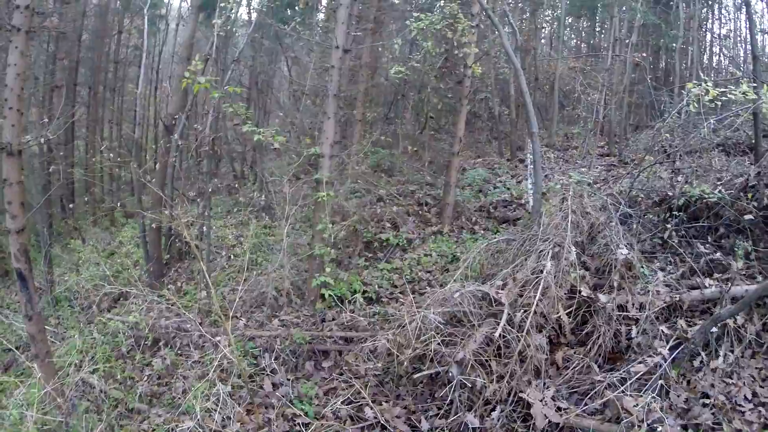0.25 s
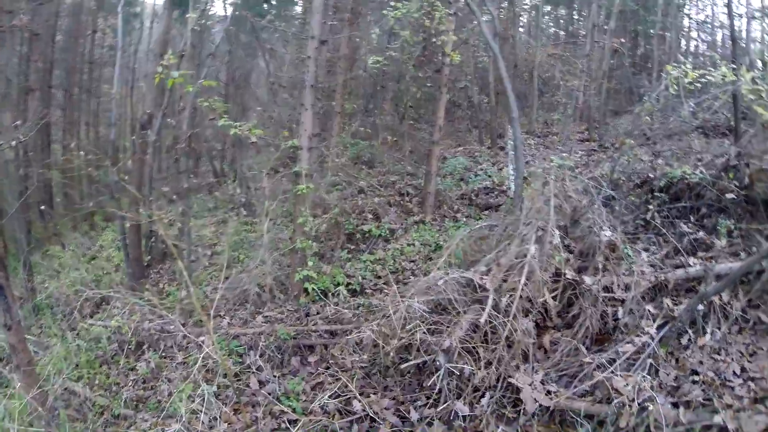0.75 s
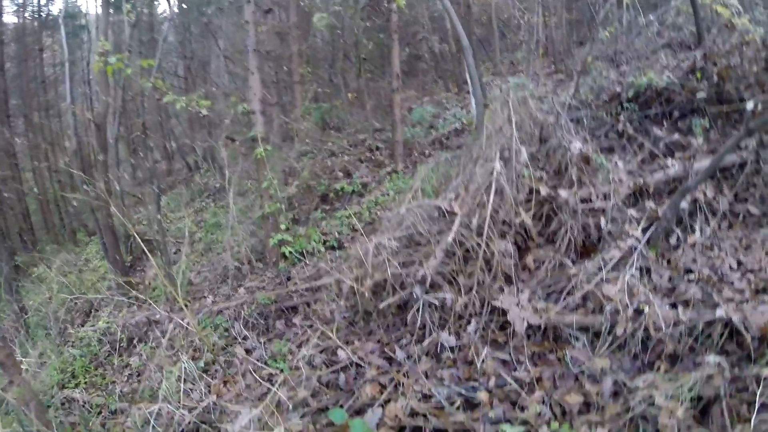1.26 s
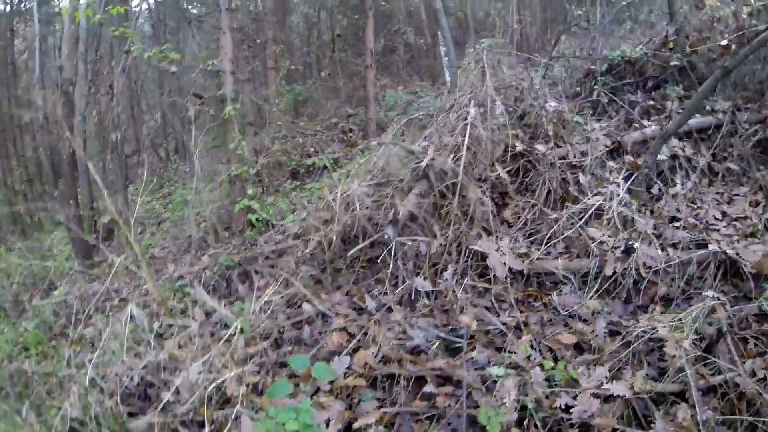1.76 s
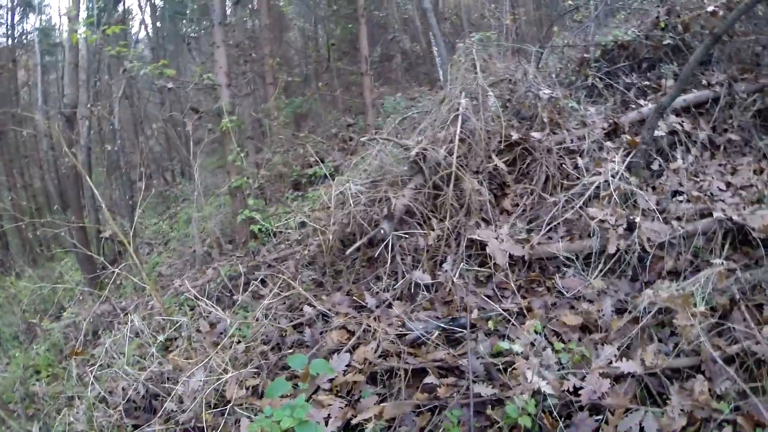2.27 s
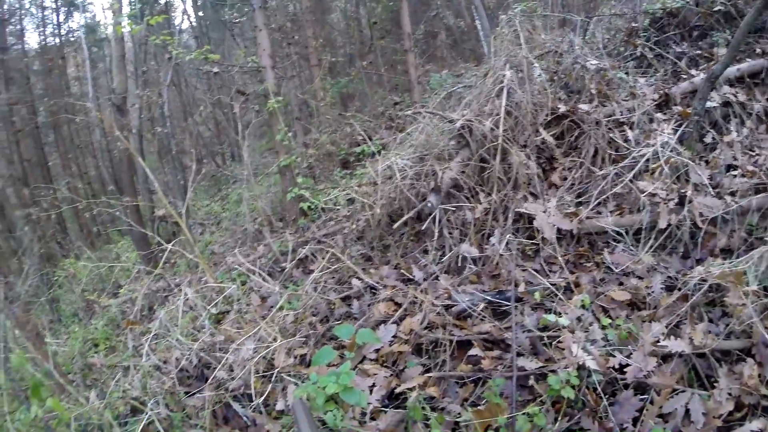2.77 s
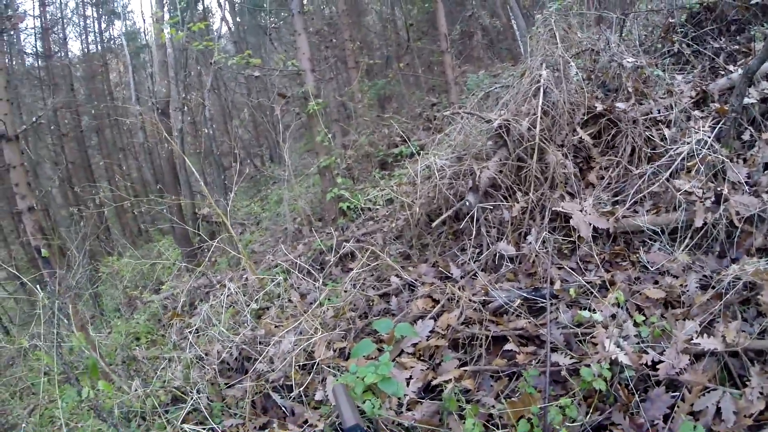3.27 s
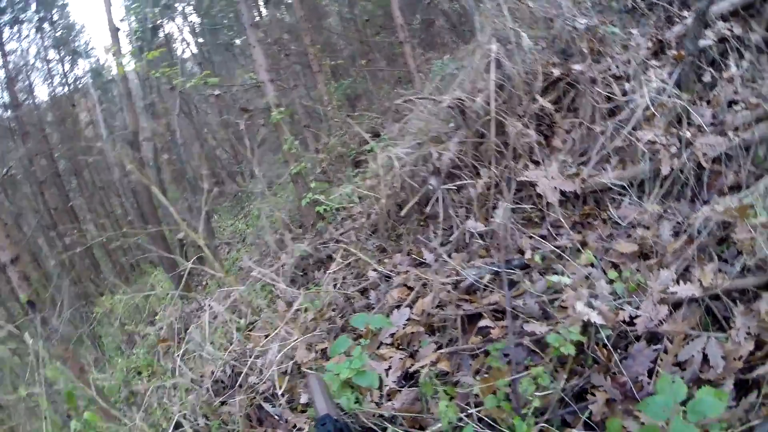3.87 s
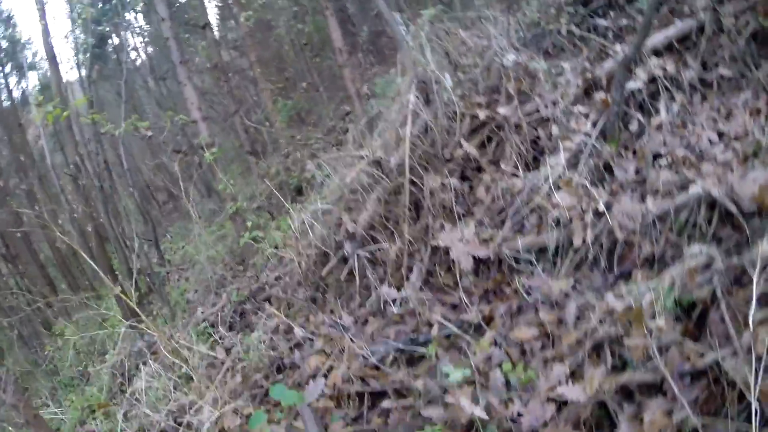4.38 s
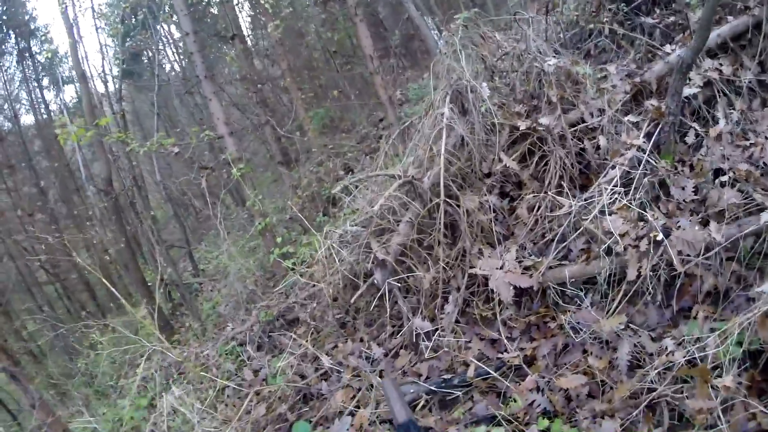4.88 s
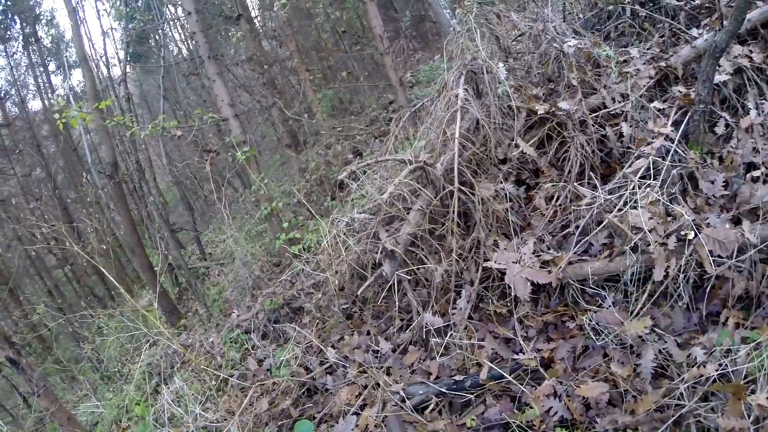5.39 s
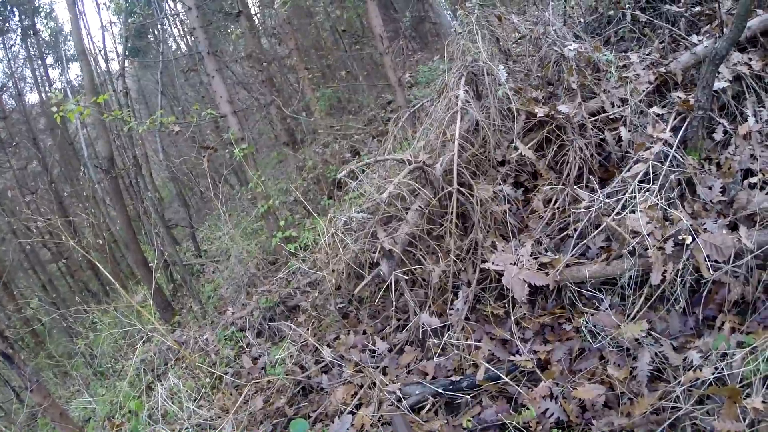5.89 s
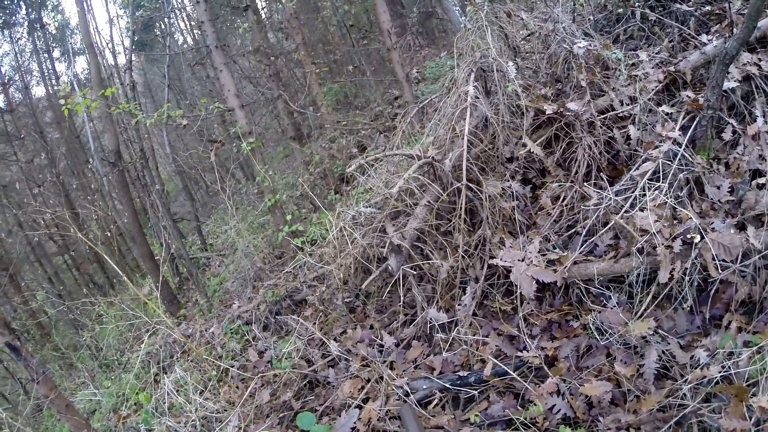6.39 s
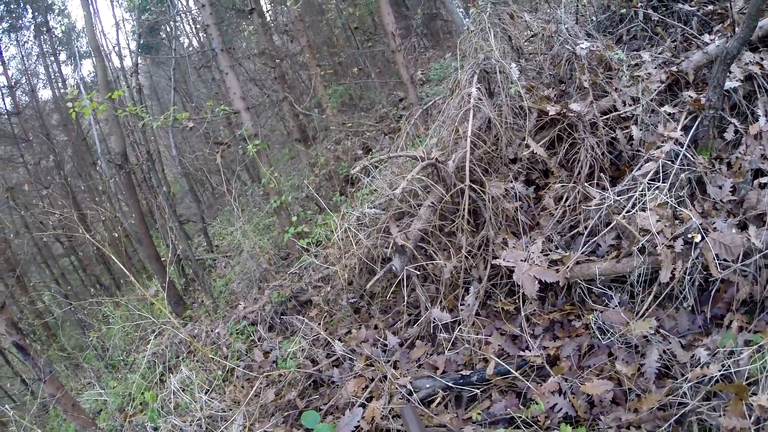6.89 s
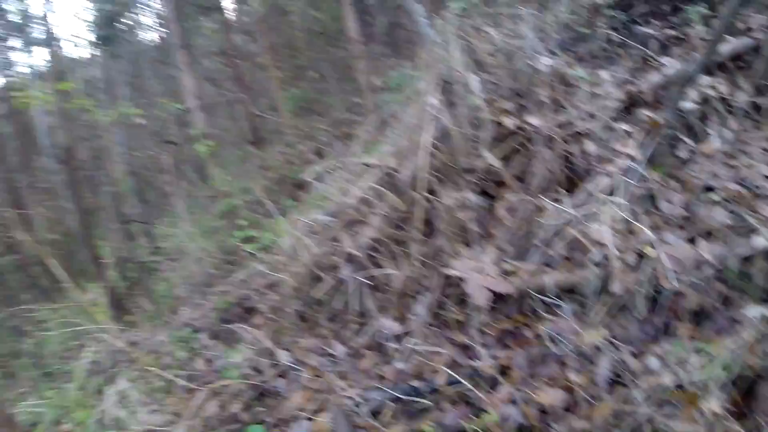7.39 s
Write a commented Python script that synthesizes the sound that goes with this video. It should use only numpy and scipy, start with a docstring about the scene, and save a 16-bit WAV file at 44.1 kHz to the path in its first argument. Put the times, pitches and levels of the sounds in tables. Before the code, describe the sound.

Someone moves slowly through dry leaves and brush on a wooded hillside. Small twigs tick first, then a hard double crack and leaf crunch come near two seconds, and another crunching step past four. Clothing rubs, a sleeve swishes, and the camera's little motor chatters in fast pulses close to the microphone, over soft air hiss and a thin electronic whine.

```python
"""A wooded slope: slow steps through dry leaves and brush, heard from a hand-held camera.
Twigs snap as bursts of tearing noise that ring the stick; the camera housing colours them and the woods answer.
Leaves crush as clumps of tiny impulses; clothes and the gripping hand are filtered noise that swells with each move.
A small motor in the camera chatters in runs of thumps, knocks and whirrs, over air, hiss and a thin electronic whine."""
import sys
import numpy as np
from scipy import signal
from scipy.fft import rfft, irfft, next_fast_len
from scipy.io import wavfile
from scipy.ndimage import uniform_filter1d, map_coordinates

SR = 44100
rng = np.random.default_rng(int(sys.argv[2]) if len(sys.argv) > 2 else 0)


def wrap_up_sound(samples):
    """Save the sound to the file named by the first command line argument, as 16-bit audio."""
    columns = np.atleast_2d(samples).T
    # keep every value between -1 and 1, then stretch to whole-number steps
    tamed = np.clip(columns, -1, 1)
    steps = np.round(tamed * 32767).astype(np.int16)
    wavfile.write(sys.argv[1], SR, steps)


N = 337365  # length [samples]


def amp(db):
    """Decibels to gain."""
    return 10 ** (np.asarray(db) / 20)


def unit(x):
    """Scale to rms 1."""
    return x / np.sqrt(np.mean(x ** 2) + 1e-20)


def along(points, hz):
    """Read (frequency [Hz], value) points on a log frequency axis."""
    f, v = np.transpose(points)
    return np.interp(np.log(hz + 1), np.log(f + 1), v)


def wobble(rate):
    """A smooth random curve with rate knots a second."""
    knots = rng.standard_normal(int(N * rate / SR) + 4)
    return map_coordinates(knots, [np.arange(N) * rate / SR])


def coloured(x, gain_db):
    """Causal minimum-phase filter, made by folding the cepstrum of gain_db(hz)."""
    m = 2 * next_fast_len(len(x) // 2 + 2048)
    cepstrum = irfft(np.log(amp(gain_db(np.fft.rfftfreq(m, 1 / SR))) + 1e-6))
    cepstrum[1:m // 2] *= 2
    cepstrum[m // 2 + 1:] = 0
    return irfft(rfft(x, m) * np.exp(rfft(cepstrum)))[:len(x)]


def shaped(x, spectrum):
    """Filter x through a spectrum, then scale to rms 1."""
    return unit(coloured(x, lambda hz: along(spectrum, hz)))


def add(track, s, sound):
    """Mix a sound into the track at s seconds."""
    part = track[max(round(s * SR), 0):][:len(sound)]
    part += sound[:len(part)]


def tone(hz):
    """A sine that follows a pitch curve."""
    return np.sin(2 * np.pi * np.cumsum(hz) / SR)


def fractures(per_s, spread_db):
    """Random impulses, scaled to rms 1: many small, a few large."""
    sizes = amp(spread_db * np.minimum(rng.exponential(size=N), 3))
    signs = rng.choice([-1, 1], N)
    return unit((rng.random(N) < per_s / SR) * signs * sizes)


def gesture(start, end, db, rise, fall):
    """A gain that rises, holds from start to end [s] and dies away; slopes in dB a second."""
    t = np.arange(N) / SR
    return amp(db - rise * np.maximum(start - t, 0) - fall * np.maximum(t - end, 0))


def together(gains, rest_db):
    """Overlapping gestures add in power over a resting level."""
    return np.sqrt(amp(rest_db) ** 2 + sum(gain ** 2 for gain in gains))


# colour of the still air and hiss: (frequency [Hz], relative gain [dB])
AIR_COLOUR = [(25, -6.5), (110, 2.5), (300, -10.5), (1000, -16), (2000, -17.5), (4000, -28.5),
              (5600, -21.5), (6500, -21.5), (8500, -29.5), (13500, -31.5), (15200, -24), (16000, -48)]


def background(air_db=-62.0, whine_db=-65.5, whine_hz=5000, blip_hz=260):
    """Still air and hiss, with a fuzzy sine whine that flicks upward four times a second."""
    t = np.arange(N) / SR
    blips = np.maximum(np.cos(2 * np.pi * (t - .05) / .2502), 0) ** 30
    pitch = whine_hz + blip_hz * blips + 22 * wobble(30) + 80 * wobble(700)
    strength = amp(-2 * blips + 2.8 * wobble(120))
    whine = amp(whine_db) * strength * tone(pitch)
    air = amp(air_db) * shaped(rng.standard_normal(N), AIR_COLOUR)
    return whine + air


# how long the tail among the trunks rings: (frequency [Hz], 60 dB decay time [s])
TRUNK_DECAY = [(150, 0.43), (1000, 0.27), (4000, 1), (12000, 0.55)]


def woods(x, wet_db=-23, slope_db=-13, slope_delay=.0108):
    """The slope throws back one bright echo; trunks scatter a faint, diffuse tail."""
    hz, t, grains = signal.stft(rng.standard_normal(SR // 2), SR, nperseg=256)
    decay = amp(-60 * t / along(TRUNK_DECAY, hz)[:, None])
    tail = signal.istft(grains * decay, SR, nperseg=256)[1]
    tail = np.pad(tail, (SR // 125, 0))  # the tail starts 8 ms late
    delayed = np.pad(x, (round(slope_delay * SR), 0))[:N]
    echo = coloured(delayed, lambda f: along([(300, -15.0), (2500, -6.5), (8000, 0.5)], f))
    scattered = signal.fftconvolve(x, tail / np.linalg.norm(tail))[:N]
    return amp(slope_db) * echo + amp(wet_db) * scattered


# motor runs: (first stroke [s], end [s], stroke period [s], level over the motor's own level [dB])
MOTOR_RUNS = [(2.138, 3.3, .0884, -.5), (3.632, 5.2, .091, .5), (5.736, 6.44, .0897, 1.5),
              (6.895, 7.64, .0885, 1.5)]
# colour of the rattle: (frequency [Hz], relative gain [dB])
RATTLE_COLOUR = [(50, -1), (110, 11), (200, -10.5), (380, -9.5), (520, 6), (700, 8), (950, 5.5), (1200, 5),
                 (1500, -3), (2300, -2.5), (3300, -8.5), (4200, -5.5), (6500, -16), (14000, -40)]


def motor(level_db=-55.5, rattle_db=3, thump_db=3, knock_db=4, spin_db=6, whirr_db=-2,
          thump_hz=105, knock_hz=550, whirr_hz=950, start_hz=800, spun_hz=1060, spin_time=0.02606):
    """Eleven jerks a second: a thump, a gear knock and a rising whirr, over a steady whirr and rattle."""
    t = np.arange(N) / SR
    running, age = np.zeros(N), np.zeros(N)  # age: seconds since the last stroke
    for start, end, period, db in MOTOR_RUNS:
        on = (t > start) & (t < end)
        running += on * amp(db)
        age += on * ((t - start) % period)

    def swell(centre, width):
        """A bump in every stroke, slightly uneven in level."""
        return np.exp(-((age - centre) / width) ** 2) * amp(1.9 * wobble(15))

    jerk, mesh, spin_up = swell(.007, .006), swell(.012, .005), swell(.018, .013)
    thump = amp(thump_db) * jerk * tone(thump_hz + 15 * wobble(60))
    knock = amp(knock_db) * mesh * tone(knock_hz + 50 * wobble(200))
    spin_hz = start_hz + (spun_hz - start_hz) * np.minimum(age / spin_time, 1) + 55 * wobble(400)
    spin = amp(spin_db + 2.4 * wobble(180)) * spin_up * tone(spin_hz)
    coast = amp(whirr_db + 1.2 * wobble(160)) * tone(whirr_hz + 90 * wobble(350))
    rattle = amp(rattle_db) * (jerk + 0.38) * shaped(rng.standard_normal(N), RATTLE_COLOUR)
    return amp(level_db) * running * (thump + knock + spin + coast + rattle)


# the hand changes its grip on the camera: (start [s], end [s], level [dB])
GRIP_CHANGES = [(0.737, 0.75, -49.5), (1.2, 1.38, -53.5), (1.87, 1.9, -69), (3.04, 3.1, -60.5),
                (4.39, 4.42, -50), (4.78, 4.91, -50.5)]


def handling(slope_db_per_s=150, steady_db=-65.5):
    """The hand rumbles on the camera body: low noise that swells at each change of grip."""
    grips = [gesture(*row, slope_db_per_s, slope_db_per_s) for row in GRIP_CHANGES]
    rumble = shaped(rng.standard_normal(N), [(10, -13.5), (30, -9), (65, -11.5), (200, -27), (800, -67)])
    return together(grips, steady_db) * rumble


# strides and shifts of weight, levels before each layer's trim:
# (start [s], end [s], leaf rustle [dB], clothing [dB])
BODY_MOVES = [(0, 0.021, -63, -68), (0.721, 1.02, -61, -54), (1.661, 2.04, -54.5, -48.5),
              (2.401, 3.333, -62, -69), (3.97, 4.3, -53.5, -54.5), (4.449, 4.72, -48.5, -48.5),
              (5.105, 5.169, -61, -70), (5.6, 6.422, -66, -67), (6.97, 7.298, -63, -61),
              (7.5, 7.642, -58, -50.5)]
# the sole takes the full weight, levels before each layer's trim: (time [s], leaf crush [dB], clothing [dB])
FULL_WEIGHT = [(1.94, -41.5, -40.5), (4.69, -42.5, -48)]
MOVE_SLOPES = 55, 40.5  # rise, fall [dB/s]
FOOT_SLOPES = 200, 109  # rise, fall [dB/s]
STILL_LEAVES_DB, STILL_CLOTH_DB = -78, -66  # the walker standing, before each layer's trim


def walking():
    """Gains of the leaves and of the clothes: the same moves and footfalls drive both."""
    def effort(column, rest_db):
        """One layer's gain, from its own level column."""
        moves = [gesture(start, end, db[column], *MOVE_SLOPES) for start, end, *db in BODY_MOVES]
        falls = [gesture(s, s, db[column], *FOOT_SLOPES) for s, *db in FULL_WEIGHT]
        return together(moves + falls, rest_db)

    return effort(0, STILL_LEAVES_DB), effort(1, STILL_CLOTH_DB)


# a sleeve slides over the jacket: (start [s], end [s], level [dB])
SLEEVE_SLIDES = [(0.663, 1.3, -56), (1.65, 1.85, -57), (1.947, 2.195, -49), (6.236, 6.29, -59.5),
                 (7.45, 7.655, -52.5)]
# colour of the body fabric: (frequency [Hz], relative gain [dB])
FABRIC_COLOUR = [(40, -6), (110, -8.5), (280, 1.5), (480, -1), (650, -1.5), (950, -2.5), (1400, -12),
                 (2300, -11.5), (3300, -28), (5000, -50), (12000, -60)]
# colour of the sleeve: (frequency [Hz], relative gain [dB])
SLEEVE_COLOUR = [(100, -14), (400, -11.5), (900, -1), (1400, -2.5), (2200, -4), (3300, -11), (4500, -15),
                 (12000, -65)]


def clothes(sway, level_db=2.5, flutter_db=-2.6, arm_rise=150, arm_fall=120):
    """Fabric rubs as the walker shifts weight, and a sleeve swishes when the arm moves (slopes in dB/s)."""
    flutter = flutter_db * wobble(45)
    rub = sway * amp(level_db + flutter) * shaped(rng.standard_normal(N), FABRIC_COLOUR)
    arm = np.max([gesture(*row, arm_rise, arm_fall) for row in SLEEVE_SLIDES], axis=0)
    swish = arm * amp(flutter) * shaped(rng.standard_normal(N), SLEEVE_COLOUR)
    return rub + swish


# colour of crushed leaves: (frequency [Hz], relative gain [dB])
LEAF_COLOUR = [(150, -26), (400, -11.5), (700, -1.5), (1000, 4.5), (1500, -9.5), (2600, -10.5),
               (3200, -4.5), (4000, -10), (5400, -14.5), (6600, -11.5), (9000, -23), (15500, -34.5)]


def leaves(tread, level_db=5.0, spread_db=4, clump_db=-1.7, rib_db=-6.5):
    """Tiny leaf fractures come in clumps over the rub of leaf on leaf, with stiff ribs cracking among them."""
    rub = .7 * rng.standard_normal(N)
    crush = (fractures(1800, spread_db) + rub) * amp(clump_db * wobble(76))
    # a rib tears for a millisecond or two
    tearing = signal.lfilter([1], [1, -np.exp(-1 / (0.0017 * SR))], abs(fractures(70, 1.7)))
    ribs = amp(rib_db) * unit(tearing * rng.standard_normal(N))
    return tread * amp(level_db) * shaped(unit(crush) + ribs, LEAF_COLOUR)


def small_stalks(tread, count=16, over_db=2.0, scatter_db=-0.5, knock_db=-4, splinter_db=-1,
                 stick_hz=3000, octaves=0.79):
    """Twig rows for little stalks that give way at random, more often and louder under a heavier tread."""
    rows = []
    chances = (np.arange(count) + rng.random(count)) / count
    effort = np.cumsum(tread)
    for chance, (size, dryness, thinness) in zip(chances, rng.standard_normal((count, 3))):
        at = np.searchsorted(effort, chance * tread.sum())
        crack_db = 20 * np.log10(tread[at]) + over_db + scatter_db * size
        dry_db = splinter_db + scatter_db * dryness
        rows.append((at / SR, crack_db, knock_db, dry_db, stick_hz * 2 ** (octaves * thinness), 0))
    return rows


def breakage(crack_db, knock_db, splinter_db, stick_hz):
    """Thick sticks thud, woody knocks stop short, and a harder, drier break shakes more leaves."""
    # the thud takes a share of the knock and weakens in thinner, higher sticks
    thud_db = -4.5 + 0.53 * knock_db - 8.5 * np.log2(stick_hz / 1000)
    band_db = crack_db + np.array([thud_db, knock_db, 0, splinter_db])
    # a thin stalk rings for 18 ms; every 16.5 dB of woody knock halves that
    t60 = 0.018 * .5 ** (max(knock_db, 0) / 16.5)
    # -43 dB is a usual crack
    litter_db = -55 + 0.59 * (crack_db + 43) + 0.35 * splinter_db
    return band_db, t60, litter_db


# resonances of the camera shell: (centre [Hz], width [Hz], boost [dB])
SHELL_MODES = [(425, 120, 3), (1090, 290, 3), (3240, 230, 8.5), (6450, 460, 8.5)]


def housing(hz):
    """Gain in dB of the camera shell's resonances."""
    return sum(db / (1 + (2 * (hz - centre) / width) ** 2) for centre, width, db in SHELL_MODES)


# twigs and stalks breaking, levels before the twig trim: (time [s], crack [dB], woody knock over the crack [dB],
# dry splinter over the crack [dB], stick resonance [Hz], sparkle from 11 kHz up [dB])
TWIG_BREAKS = [(0.1665, -40, -6, -8.5, 3100, -2), (0.171, -41.5, -0.5, -9, 1110, -1),
               (0.2, -48.5, -1.5, -7, 1150, -5), (0.256, -32.5, 8, -7.5, 1004, -3),
               (0.599, -45, -3.5, -8.5, 1200, -2), (0.732, -43.5, 11.5, 1.5, 1210, -7),
               (0.734, -40.5, 5, -10, 1100, 4), (0.742, -41, -5, -11, 4770, -3),
               (0.789, -44.5, 4, -4, 926, 4), (0.868, -48, 0, -1.5, 1110, 9),
               (1.7063, -40, 2.5, -2.5, 1320, 1), (1.7481, -51, 16, 2.5, 656, 12),
               (1.81, -52.5, -7, 12.5, 6840, 2), (1.8285, -38.5, -1, 2.5, 6950, 1),
               (1.8543, -19.5, 1, 0, 850, -3), (1.8781, -22, -2, -3.5, 563, -3),
               (1.889, -52.5, 27.5, 0, 1010, -6), (1.9663, -46, 26.5, 2, 614, 1),
               (1.992, -41, 20, -5, 880, -3), (2.009, -41.5, 1, -4, 456, -5),
               (2.332, -52, -3, 5.5, 4220, -10), (2.36, -48, 0, -1, 3620, -14),
               (2.378, -49, -3.5, -11, 507, -4), (2.44, -56.5, -2, 3.5, 1110, -1),
               (2.478, -56, -4, 3, 640, 3), (2.7104, -47, 9.5, 2, 680, 6),
               (3.1778, -41, -39, -23, 3540, -17), (3.2415, -47, 8, 12, 1000, 8),
               (3.298, -44.6, -26, -6, 3560, 8), (3.368, -45.5, -27, -8, 3960, 2),
               (3.444, -47, -5, -4, 2640, 4), (3.594, -46.5, -9, -13.5, 2960, 9),
               (3.687, -52, -1, 1, 3930, -1), (4.069, -44, 5.5, -1.5, 1050, 9),
               (4.1315, -40, 8.5, -7.5, 1070, -2), (4.146, -43, 13.5, -13, 513, -5),
               (4.248, -40, 17, -4, 874, -9), (4.693, -40.5, 13, 2.5, 1080, 2),
               (4.717, -37, -4, -17, 3040, -8), (4.799, -44.5, -15, 2.5, 6380, 7),
               (4.813, -41, -6, -3, 830, -4), (4.827, -40.5, -1, -11, 890, -2),
               (4.883, -41.5, 0.5, -7.5, 870, 3), (5.104, -44.5, -2, -5, 920, 5),
               (5.1626, -32.5, -0.5, -6, 1170, 3), (5.3136, -43.5, -4, -2, 1330, 5),
               (5.3385, -53, 5, 5, 3930, 1), (5.4102, -47.5, -14, 3, 3800, 0),
               (5.519, -47.5, -4, -34, 2060, 3), (5.652, -45.5, -5, 1, 3300, 13),
               (5.843, -51.5, -3, 1.5, 1100, 0), (6.126, -52, -1, -1.5, 3500, 0),
               (6.2433, -59, 17, -20, 1210, -6), (6.414, -37.5, -13, -19, 2360, -4),
               (6.531, -54, 1, 0, 4330, 0), (6.5789, -29, 5.5, -6, 980, 5), (7.07, -48, 0, 2.5, 815, 17),
               (7.143, -44, -1, 1, 5870, 5), (7.159, -50.5, 2, -2, 4030, -11),
               (7.279, -50, -2, -6, 6400, 4), (7.33, -58.5, 15.5, -18, 420, -3),
               (7.566, -42, 3.5, -5.5, 830, -9.5), (7.601, -39.5, -6.5, -5, 870, -4)]
# centres of the thud, knock, crack and splinter bands: (frequency [Hz])
BAND_CENTRES = [330, 950, 2700, 6000]
# colour of a snap before its four bands are balanced: (frequency [Hz], relative gain [dB])
SNAP_COLOUR = [(40, -11), (110, -1.5), (260, 0.5), (620, 1), (1200, -3.5), (1450, -9), (2000, -4.5),
               (2600, -7), (3300, -7.5), (4700, -9), (5400, -16), (8000, -17.5), (13000, -34.5),
               (16000, -44)]
# colour of the shivering litter: (frequency [Hz], relative gain [dB])
SHIVER_COLOUR = [(150, -6), (400, -10), (1000, 4), (1600, -1), (4000, 3.5), (7000, 0.5), (9000, -8),
                 (12500, -13.5), (15500, -33)]


def twigs(breaks, level_db=-0.77, rise=0.00041, fibre_db=3, stick_db=7, stick_width=0.3,
          shiver_t60=0.37, shiver_grain_db=4.0):
    """Each twig's fibres fail within milliseconds and ring the stick; the litter around it then shivers."""
    out, t = np.zeros(N), np.arange(SR // 4) / SR
    hz = np.fft.rfftfreq(len(t), 1 / SR)
    edges, span = [120, 600, 1500, 4500, 15000], .008  # bands [Hz], time that band power refers to [s]
    for s, crack_db, knock_db, splinter_db, stick_hz, lift_db in breaks:
        band_db, t60, litter_db = breakage(crack_db, knock_db, splinter_db, stick_hz)
        fibres, sizes, litter, flakes = rng.standard_normal((4, len(t)))

        def stick(f):
            """Resonance of the stick [dB]."""
            return stick_db / (1 + (2 * (f / stick_hz - 1) / stick_width) ** 2)

        def sparkle(f):
            """Lift or loss of the top octave [dB]."""
            return along([(7000, 0), (11000, lift_db)], f)

        # a quick ring, then a weaker and slower tail
        ring = amp(-60 * t / max(t60, .004)) + amp(-24.0 - 60 * t / 0.098)
        stress = (1 - np.exp(-t / rise)) * ring
        tearing = np.tanh(fibres * amp(fibre_db * sizes)) * stress
        burst = coloured(tearing, lambda f: along(SNAP_COLOUR, f) + housing(f) + stick(f) + sparkle(f))
        # thick sticks thud and thin ones tick: steer each band to its own power
        power = 2 * abs(rfft(burst)) ** 2 / len(t) / (span * SR)
        own_db = [10 * np.log10(power[(hz > lo) & (hz < hi)].sum()) for lo, hi in zip(edges, edges[1:])]
        balance = list(zip(BAND_CENTRES, np.subtract(band_db, own_db)))
        add(out, s, amp(level_db) * coloured(burst, lambda f: along(balance, f)))
        # the shiver comes in millisecond flakes
        flaky = litter * amp(shiver_grain_db * unit(uniform_filter1d(flakes, size=50)))
        shiver = unit(coloured(flaky, lambda f: along(SHIVER_COLOUR, f) + .5 * sparkle(f)))
        fade = amp(litter_db - 60 * (t - .03) / shiver_t60) * (1 - np.exp(-t / 0.0029))
        add(out, s, fade * shiver)
    return out


def scene():
    """Sum every layer into one channel; only the snaps excite the woods."""
    tread, sway = walking()
    snaps = twigs(TWIG_BREAKS + small_stalks(tread))
    surroundings = background() + woods(snaps)
    camera = motor() + handling()
    walker = clothes(sway) + leaves(tread) + snaps
    return (surroundings + camera + walker)[None]


def record(dry, ceiling=.72, top_hz=15500):
    """The microphone rounds off the hardest peaks; the camera keeps nothing above its band limit."""
    rounded = dry / (1 + (dry / ceiling) ** 4) ** .25
    m = next_fast_len(N + SR // 2)
    kept = np.fft.rfftfreq(m, 1 / SR) < top_hz
    return irfft(rfft(rounded, m) * kept, m)[..., :N]


dry = scene()
out = record(dry)
wrap_up_sound(out)
```